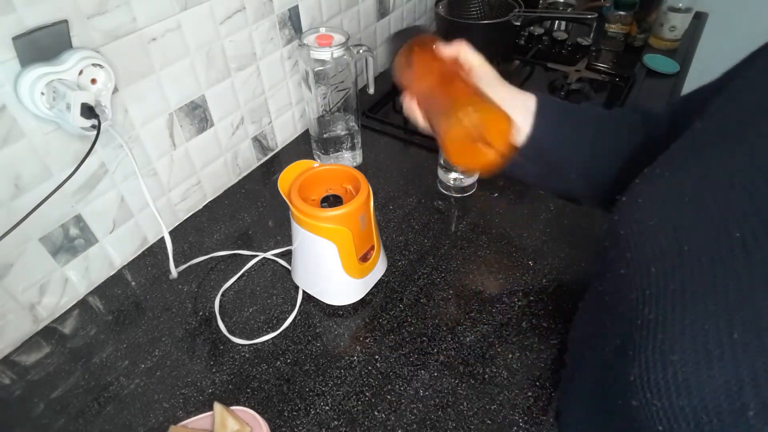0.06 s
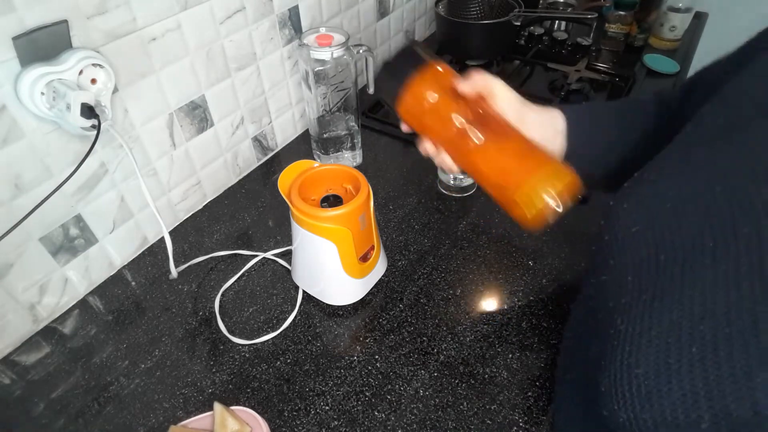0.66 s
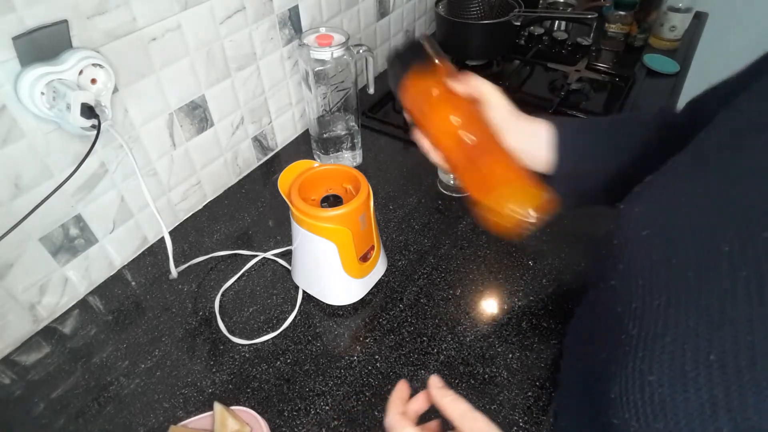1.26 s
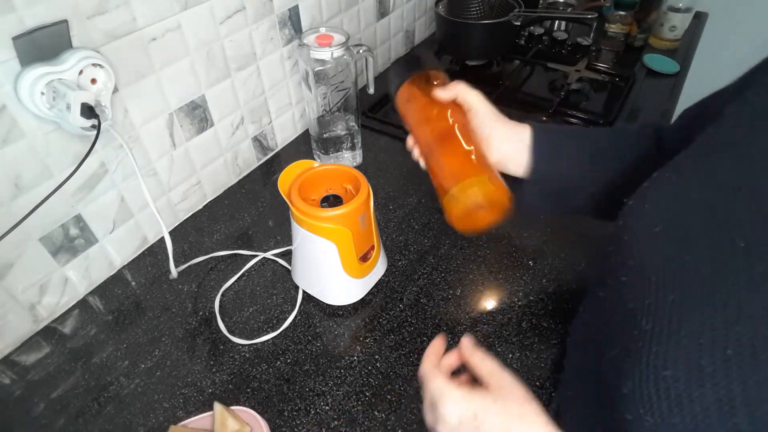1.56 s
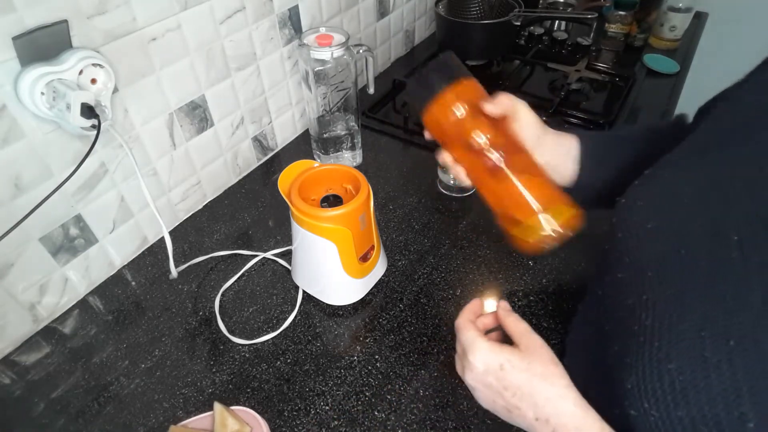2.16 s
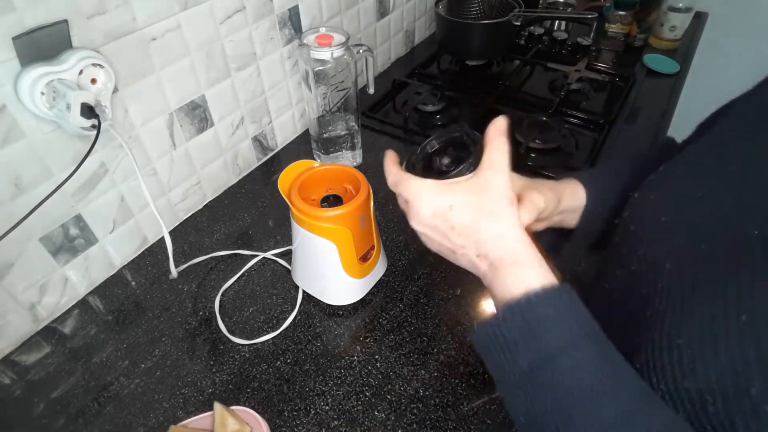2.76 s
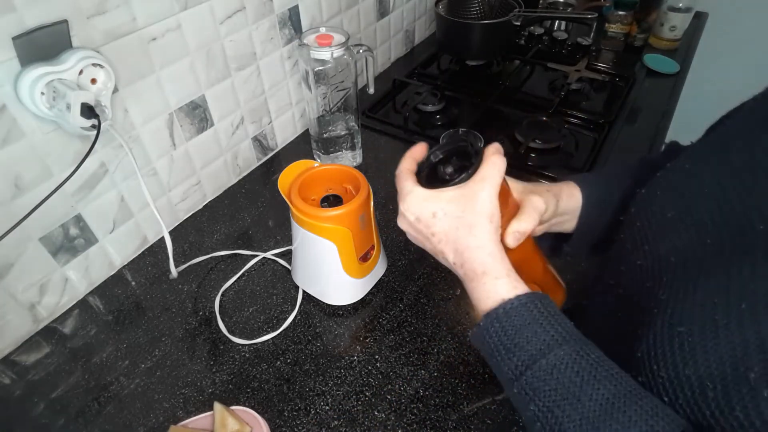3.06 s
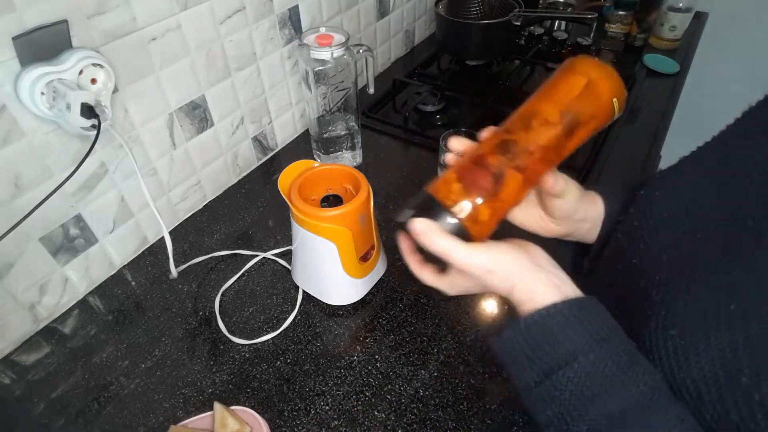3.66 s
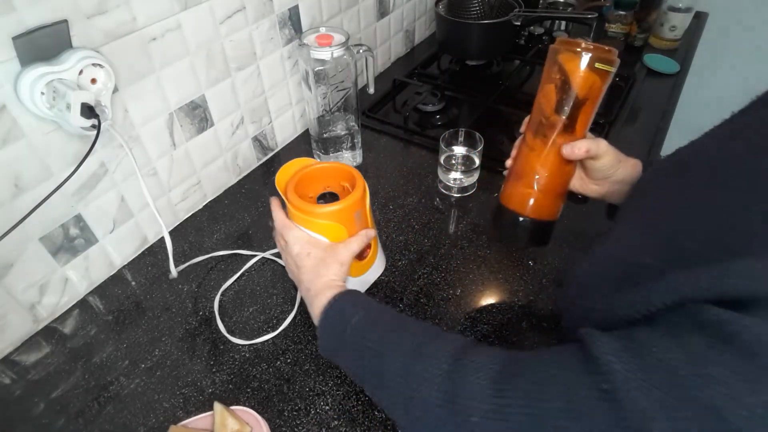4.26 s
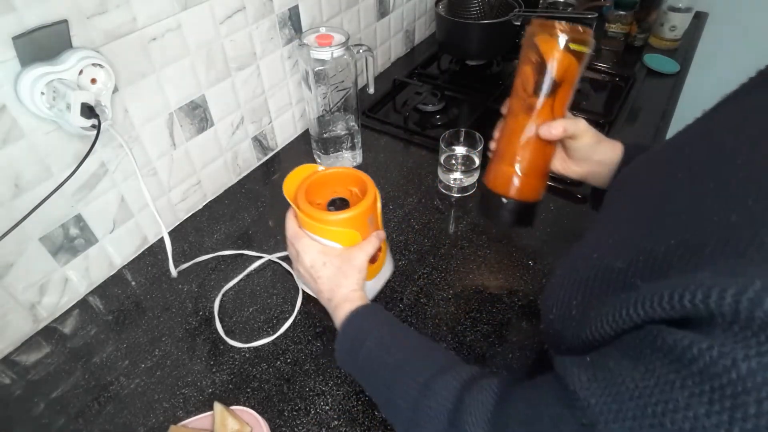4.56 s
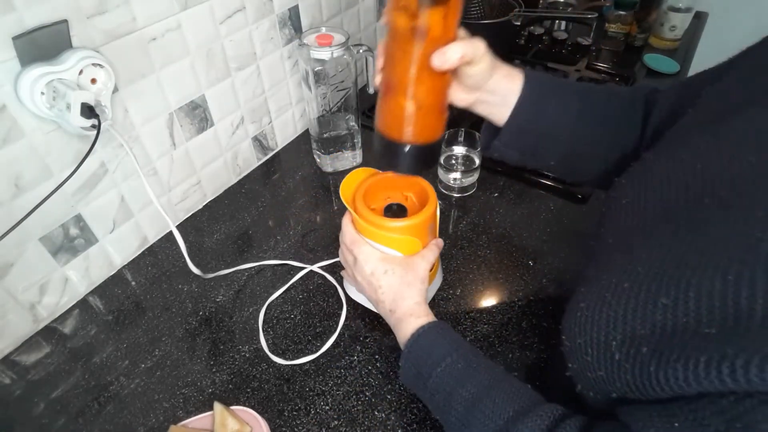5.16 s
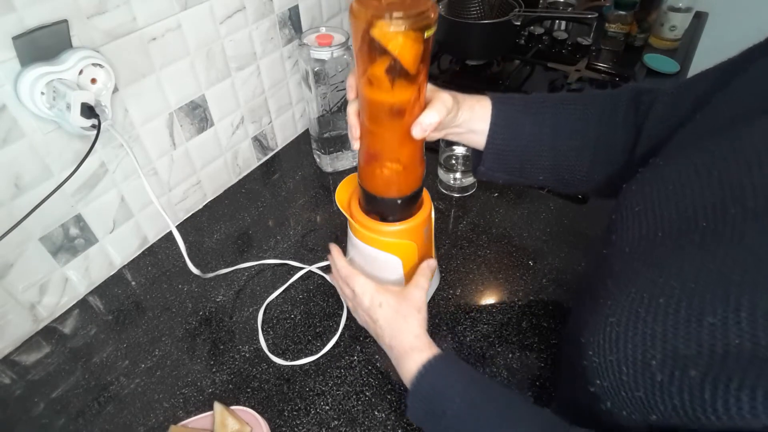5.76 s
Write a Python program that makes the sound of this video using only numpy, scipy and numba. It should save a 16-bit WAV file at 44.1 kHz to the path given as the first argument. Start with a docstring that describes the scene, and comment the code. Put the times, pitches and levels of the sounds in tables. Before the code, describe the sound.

Juice and fruit slosh and slap in a shaken plastic cup, followed by light finger clicks and a blender base knocking on a counter.

```python
"""A sealed plastic blender cup of juice and fruit, shaken four times a second over a tiled kitchen's
counter, within arm's reach of a two-port stereo microphone. Each forward stroke slaps the load against
the cup's end and sprays; each back stroke gulps; once, something glassy clinks. Fingers tap and rub as
the cup is turned over, then the motor base is gripped, knocks on the counter and judders along on its
rubber feet. Under it all lie low room tone and a faint appliance hum."""
import sys
import numpy as np
from scipy import signal
from scipy.fft import rfft, irfft
from scipy.io import wavfile
from scipy.ndimage import uniform_filter1d
from numba import njit

SR = 44100
rng = np.random.default_rng(int(sys.argv[2]) if len(sys.argv) > 2 else 0)


def dump(signal):
    """Clip the signal to [-1, 1] and save it as 16-bit WAV at the path in sys.argv[1]."""
    limited = np.clip(np.atleast_2d(signal).T, -1, 1)
    pcm = np.round(limited * 32767).astype(np.int16)
    wavfile.write(sys.argv[1], SR, pcm)


N = 255780
TIME = np.arange(N) / SR

# Table levels are relative: each source adds its own gains.
# spectra of a hard hit on the cup wall, of spray and of hollow plastic: f/Hz, level/dB
WALL_SPECTRUM = [(300, -16.5), (900, -12), (2000, -3), (3200, 0.5), (5200, 0.5), (6300, -14), (8000, -14.5),
                 (9500, -25), (12000, -20.5), (16000, -38.5)]
SPRAY_SPECTRUM = [(80, -33), (500, -14.5), (1500, -8.5), (3000, 0.5), (5200, -1), (6300, -12.5),
                  (8000, -21), (9500, -25.5), (12000, -29), (16000, -45)]
HOLLOW_SPECTRUM = [(100, -2.5), (400, 0), (800, 0.5), (1500, -8.5), (3000, -16), (8000, -32.5)]
# the load hits the cup's end: t/s, slap/dB, trapped air f/Hz, wall crack/dB, surge delay/s, surge/dB
FORWARD_STROKES = [(0.018, -23, 1620, -11, 0.017, -33), (0.178, -14.5, 1303, 1, 0.028, -32),
                   (0.436, -23.5, 1330, 7, 0.0096, -29), (0.67, -24.5, 1010, 3, 0.0092, -29.5),
                   (0.9, -23, 1330, 1, 0.047, -28), (1.165, -18, 1720, -5, 0.053, -26.5),
                   (1.433, -18.5, 1600, -1.5, .033, -30), (1.67, -20, 1640, -0.5, 0.041, -29.5),
                   (1.923, -26.5, 1560, -6, 0.038, -31.5), (2.161, -23, 1650, 1, 0.039, -32),
                   (2.409, -30, 1800, -12, 0.034, -30.5)]
# the juice falls back through the air: crest t/s, level/dB, gulp f/Hz
BACK_STROKES = [(.322, -35.5, 730), (.56, -31, 622), (.835, -30.5, 960), (1.091, -28.5, 850),
                (1.326, -26.5, 800), (1.587, -27, 620), (1.832, -29, 480), (2.091, -32, 935),
                (2.33, -32.5, 520), (2.573, -34.5, 393), (2.655, -40.5, 450)]


def amp(db):
    """Decibels to gain."""
    return 10 ** (np.asarray(db) / 20)


def unit(x):
    """Scale to an rms of one."""
    return x / np.sqrt(np.mean(x ** 2))


def add(track, s, sound):
    """Mix a sound into a track from second s on."""
    i = max(int(s * SR), 0)
    track[i:i + len(sound)] += sound[:N - i]


def gain_at(points, hz):
    """Read a table of f/Hz, level/dB as gains."""
    f, db = np.transpose(points)
    return amp(np.interp(np.log(hz + 1), np.log(f), db))


def colour(x, points, size=2048):
    """Causal filter of unit energy with the given spectral shape, built from its cepstrum."""
    cepstrum = irfft(np.log(gain_at(points, np.fft.rfftfreq(size, 1 / SR))))
    cepstrum[1:size // 2] *= 2
    cepstrum[size // 2 + 1:] = 0
    response = irfft(np.exp(rfft(cepstrum)))
    return signal.fftconvolve(x, response / np.sqrt(np.sum(response ** 2)))[:len(x)]


def ring(hz, t60):
    """One struck mode."""
    t = TIME[:SR // 2]
    return np.sin(2 * np.pi * hz * t) * np.exp(-np.log(1000) * t / t60)


def burst(fall_s):
    """A short crush of contact noise that starts at unit level."""
    shape = np.exp(-TIME[:SR // 20] / fall_s)
    return unit(rng.standard_normal(len(shape)) * shape) * np.sqrt(np.mean(shape ** 2))


def crackle(spread_db, click_samples=24):
    """Dense tiny clicks of very uneven size."""
    noise = rng.standard_normal(N)
    click_db = spread_db * np.minimum(rng.exponential(size=N // click_samples + 1), 5)
    return unit(noise * np.repeat(amp(click_db), click_samples)[:N])


def diffuse(count, alike_hz):
    """Noise from all sides: the bass is nearly the same at both ports, the treble unrelated."""
    mid, side = rfft(rng.standard_normal((2, count)))
    alike = .95 / (1 + (np.fft.rfftfreq(count, 1 / SR) / alike_hz) ** 2)
    left_right = np.array([[1], [-1]])
    return irfft(mid * np.sqrt((1 + alike) / 2) + side * np.sqrt((1 - alike) / 2) * left_right, count)


def room_tone(air_db=-62):
    """Air murmurs all round the microphone and an appliance hums faintly."""
    # the kitchen's air spectrum and the hum's tones: f/Hz, level/dB
    air_spectrum = [(15, -42.5), (25, -12), (55, -8.5), (82, -21), (104, -9), (164, -6), (183, -6.5),
                    (246, -7), (482, -21), (684, -22), (1110, -26.5), (2920, -32), (3340, -34), (7500, -42),
                    (15500, -39)]
    hum_tones = [(59.2, -87), (118.4, -77.5), (161.5, -70.5)]
    air = unit(np.array([colour(port, air_spectrum) for port in diffuse(N, alike_hz=693)]))
    hum = sum(amp(db) * unit(np.sin(2 * np.pi * hz * TIME)) for hz, db in hum_tones)
    return amp(air_db) * air + hum


def kitchen_reverb(x, bands_hz=(100, 900, 4800, 11000), t60s=(.98, .57, .57, .31), tail_db=-4):
    """The tiled kitchen rings on, shortest in the treble."""
    t = TIME[:SR]
    hz = np.fft.rfftfreq(SR, 1 / SR)
    noise, tail = rfft(diffuse(SR, alike_hz=480)), 0
    for share, t60 in zip(np.eye(4), t60s):
        band = irfft(noise * np.interp(np.log(hz + 1), np.log(bands_hz), share), SR)
        tail = tail + band * np.exp(-np.log(1000) * t / t60)
    response = amp(tail_db) * unit(tail * np.clip(t / .0033, 0, 1)) / np.sqrt(SR)
    return signal.fftconvolve(x[None], response, axes=1)[:, :N]


def near_echoes(x, early_db=-2, early_s=.0025):
    """Counter, tiles and body scatter the sound for a few milliseconds, differently at each port."""
    t = TIME[:SR // 10]
    echoes = unit(diffuse(len(t), alike_hz=560) * np.exp(-t / early_s) * (t > .0006)) / np.sqrt(len(t))
    response = rfft((t == 0) + amp(early_db) * echoes)
    # the scatter smears the sound but leaves its broad colour alone
    response = response / np.sqrt(uniform_filter1d(abs(response) ** 2, size=60, axis=1))
    return signal.fftconvolve(x[None], irfft(response, len(t))[:, :len(t) // 2], axes=1)[:, :N]


def rub_envelope(moves, attack_s=.033, release_s=.025):
    """Each rubbing movement builds up, holds for its length and dies away."""
    return sum(amp(db) * np.clip((TIME - s) / attack_s + 1, 0, 1)
               * np.exp(-np.maximum(TIME - s - length, 0) / release_s) for s, length, db in moves)


def rubbing():
    """Hands rub the plastic, a knitted sleeve swishes and the base rumbles as it drags on the counter."""
    # movements of hand, sleeve and base: t/s, length/s, level/dB
    grips = [(2.7, .1, -61), (4.31, 0.033, -49.5), (4.53, 0.31, -60), (5.1, .12, -68), (5.38, 0.064, -57),
             (5.6, 0.021, -62)]
    swishes = [(3.78, 0.11, -60.5), (3.95, .5, -65), (4.78, 0.41, -69.5), (5.4, .04, -68),
               (5.6, 0.023, -68)]
    drags = [(4.32, 0.045, -57), (4.5, 0.15, -51), (4.75, 0.062, -54), (5.1, .08, -63)]
    # friction spectra of sleeve and base: f/Hz, level/dB
    sleeve_spectrum = [(800, 0), (2000, -3.5), (3500, -4), (5000, -0.5), (6300, -17), (9000, -21),
                       (16000, -23)]
    drag_spectrum = [(25, -18), (55, 2), (105, 2.5), (170, -5.5), (400, -20), (2000, -82)]
    hands = colour(rub_envelope(grips) * crackle(spread_db=3), HOLLOW_SPECTRUM)
    sleeve = colour(rub_envelope(swishes) * crackle(spread_db=3), sleeve_spectrum)
    rumble = colour(rub_envelope(drags) * rng.standard_normal(N), drag_spectrum)
    return amp(-4.5) * hands + amp(-6) * sleeve + amp(-8.5) * rumble


def finger_taps():
    """Fingers on plastic: a sharp click, a hollow body under it and a brief ring of the touched spot."""
    # taps: t/s, click/dB, body/dB, ring f/Hz
    taps = [(2.782, -62, -60, 1424), (2.851, -56, -68, 1400), (3.671, -54, -49, 1290),
            (3.753, -42.5, -47.5, 1526), (3.772, -46.5, -63, 1500), (4.303, -54, -56, 755),
            (4.34, -49.5, -46, 1370), (4.448, -40.5, -59, 1480), (4.535, -40.5, -54.5, 1290),
            (4.592, -51, -48, 785), (4.688, -65, -50, 910), (5.406, -57.5, -49.5, 755),
            (5.496, -55.5, -70, 1310), (5.59, -60, -62, 750)]
    # the click's spectrum: f/Hz, level/dB
    click_spectrum = [(500, -32), (1500, -3.5), (3000, 1), (5000, 3.5), (6500, -12), (10000, -14.5),
                      (16000, -25)]
    clicks, bodies, rings = np.zeros((3, N))
    for s, click_db, body_db, hz in taps:
        add(clicks, s, amp(click_db) * burst(fall_s=.0023))
        add(bodies, s, amp(body_db + 2) * burst(fall_s=.0043))
        add(rings, s, amp(body_db + 10) * ring(hz, t60=.011))
    return colour(clicks, click_spectrum) + colour(bodies, HOLLOW_SPECTRUM) + rings


def feet_judder(push_s=.0024):
    """Rubber feet slip and catch on the counter; each soft push rocks the base."""
    # slips: t/s, level/dB
    slips = [(5.375, -34), (5.403, -33.5), (5.436, -32.5), (5.473, -33.5), (5.512, -38), (5.55, -42.5),
             (5.585, -43.5)]
    # modes of the base on its feet: f/Hz, level/dB, t60/s
    rocking_modes = [(90.3, -7, 0.04), (108, -1.5, 0.11), (152.4, -19, 0.056), (323, -12.5, 0.062),
                     (486, -12, 0.033), (747, -32, 0.12)]
    push = 1 - np.exp(-TIME[:SR // 2] / push_s)
    rocking = sum(amp(db) * ring(hz, t60) for hz, db, t60 in rocking_modes)
    out = np.zeros(N)
    for s, db in slips:
        add(out, s, amp(db) * push * rocking)
    return out


def base_knock():
    """The motor base drops onto its foot: the shell sounds first, the heavy body just after."""
    # the landing on the counter: t/s, level/dB
    landings = [(4.7293, -30)]
    # modes of the base: f/Hz, level/dB, t60/s, delay/s
    base_modes = [(130, -21, 0.07, 0.0044), (542, 4.5, 0.015, 0.0022), (703, -2, 0.033, 0),
                  (1130, -5.5, 0.016, 0.0015), (2450, 1.5, 0.014, 0.0041), (2700, -14, 0.014, 0.0019),
                  (7600, -26, 0.0074, 0)]
    out = np.zeros(N)
    for s, db in landings:
        for hz, mode_db, t60, delay in base_modes:
            add(out, s + delay, amp(db + mode_db) * ring(hz, t60))
    return out


def glass_clink(detune=.0019):
    """A quick chatter of hard contacts sets the same high modes ringing."""
    # contacts: t/s, level/dB, tilt/(dB per octave)
    contacts = [(.4612, -27, -0.5), (.4635, -20, 0.5), (.479, -19.5, 3)]
    # glassy modes: f/Hz, level/dB, t60/s
    glass_modes = [(3482, -4.5, 0.05), (3510, 0.5, 0.057), (4640, -1.5, 0.12), (5168, 0, 0.092),
                   (5180, -2, .12), (6330, -6.5, 0.1), (7520, -10, .09), (10130, -7, .1),
                   (10380, -22.5, 0.11), (12260, -13, 0.074), (13000, -13, .09), (14330, -29, .1),
                   (15430, -22, .06)]
    rings, clicks = np.zeros((2, N))
    for s, db, tilt_db in contacts:
        for hz, mode_db, t60 in glass_modes:
            gain = amp(db + mode_db + tilt_db * np.log2(hz / 5000))
            add(rings, s, gain * ring(hz * (1 + detune * rng.standard_normal()), t60))
        add(clicks, s, amp(db - 3) * burst(fall_s=.0065))
    return amp(-5) * rings + colour(clicks, WALL_SPECTRUM)


@njit
def chirps(starts, hz, gains, cycles, glide):
    """Bubble tones: damped sines whose pitch rises as they fade."""
    out = np.zeros(N)
    for k in range(len(starts)):
        life = cycles[k] * SR / hz[k]
        for i in range(min(int(life), N - starts[k])):
            age = i / life
            swell = 1 - np.exp(-age * cycles[k])
            phase = 2 * np.pi * hz[k] * i / SR * (1 + glide * age / 2)
            out[starts[k] + i] += gains[k] * swell * np.exp(-6 * age) * np.sin(phase)
    return out


def plinks(cycles=30.0, glide=.13):
    """Small bubbles ring long enough to stand out of the wash."""
    # single bubbles: t/s, level/dB, f/Hz
    lone_bubbles = [(.769, -31.5, 3430), (1.2872, -20, 3820), (1.327, -24, 3130), (1.469, -26.5, 4200),
                    (1.780, -29.5, 3700), (2.5128, -31.5, 3510)]
    s, db, hz = np.transpose(lone_bubbles)
    return chirps((s * SR).astype(np.int64), hz.copy(), amp(db + 4), np.full(len(s), cycles), glide)


def glugs(count=3, gap_s=.013, step_octaves=.25, scatter_octaves=.12, cycles=9.0, glide=.15):
    """On each back stroke the air breaks through in a few bubbles, the biggest and lowest first."""
    s, db, hz = np.repeat(BACK_STROKES, count, axis=0).T
    late, detune = rng.uniform(-.87, 1, (len(s), 2)).T
    turn = np.arange(len(s)) % count - (count - 1) / 2
    starts = ((s + gap_s * (turn + late / 2)) * SR).astype(np.int64)
    bubble_hz = hz * 2 ** (step_octaves * turn + scatter_octaves * detune)
    return chirps(starts, bubble_hz, amp(db - 2), np.full(len(s), cycles), glide)


def bubbles(flow, low_hz, high_hz, cycles, spread_db, count, glide=.15, sink_octaves_per_s=0):
    """Air pockets ring briefly, each scaled by the flow that made it; foam can lower their pitch."""
    when, pitch, size, life, sign = rng.random((count, 5)).T
    starts = ((np.arange(count) + when) * (N - 1) / count).astype(np.int64)
    shaken_s = np.minimum(starts / SR, BACK_STROKES[-1][0])
    hz = low_hz * (high_hz / low_hz) ** pitch * 2 ** (-sink_octaves_per_s * shaken_s)
    gains = amp(-spread_db * np.log(np.maximum(size, .03))) * np.sqrt(hz) * np.sign(sign - .5)
    lives = cycles * (.5 + life)
    steady_rms = np.std(chirps(starts, hz, gains, lives, glide))
    return chirps(starts, hz, gains * flow[starts], lives, glide) / steady_rms


def surge(s, rise_s, fall_s, churn_db=-23, churn_s=.065):
    """The flow swells to a crest at second s and falls away, with weaker churning around it."""
    age = TIME - s
    return np.exp(np.minimum(age / rise_s, -age / fall_s)) + amp(churn_db) * np.exp(-abs(age) / churn_s)


def slosh(deepen_db_per_s=1.5, dull_db_per_s=1.5):
    """Every surge folds in bubbles and throws spray: forward strokes are bright, back strokes deep."""
    forward = sum(amp(db) * surge(s + delay, rise_s=.019, fall_s=.021)
                  for s, *_, delay, db in FORWARD_STROKES)
    back = sum(amp(db) * surge(s, rise_s=.016, fall_s=.013) for s, db, _ in BACK_STROKES)
    flow = forward + back
    # as the juice foams up, the slosh gets deeper and the back strokes spray less
    end = BACK_STROKES[-1][0]
    foam_s = np.minimum(TIME, end) - end / 2  # time from the middle of the shaking
    deep = (amp(-14) * forward + amp(-9.5) * back) * amp(deepen_db_per_s * foam_s)
    thrown = amp(-2) * forward + amp(-5.5 - dull_db_per_s * foam_s) * back
    small = bubbles(flow, low_hz=850, high_hz=2150, cycles=3.2, spread_db=5, count=4000)
    gulps = bubbles(deep, low_hz=414, high_hz=1150, cycles=6.5, spread_db=4.5, count=1500,
                    sink_octaves_per_s=.2)
    thuds = bubbles(np.sqrt(deep * flow), low_hz=110.8, high_hz=368, cycles=12, spread_db=2.5,
                    count=1600, glide=.11)
    spray = colour(thrown * crackle(spread_db=3.5), SPRAY_SPECTRUM)
    return amp(-9) * small + amp(-2) * gulps + amp(-15.5) * thuds + amp(-6.5) * spray


def slaps(cycles=8, cushion_s=.001):
    """Trapped air rings, the cup knocks and its wall cracks: sharply under juice, duller under fruit."""
    # fruit chunks that hit the wall hard: t/s, level/dB, ring f/Hz, wall crack/dB
    chunks = [(.159, -30.5, 990, 0), (.695, -16, 1790, -3), (.713, -29.5, 940, 6.5),
              (.927, -21.5, 1100, 0.5), (1.092, -28.5, 1100, -21), (1.194, -25.5, 1320, -6.5),
              (1.468, -22, 1340, 0), (1.705, -21.5, 1200, -7), (1.949, -20.5, 1660, -6.5),
              (2.43, -32.5, 1150, 9.5), (2.675, -47.5, 1080, 9)]
    # spectrum of the cup's knock: f/Hz, level/dB
    shell_spectrum = [(70, -41.5), (300, -14.5), (800, -4), (1300, -0.5), (1750, -0.5), (2200, -10.5),
                      (5000, -31.5)]
    pockets, cracks, thumps, knocks = np.zeros((4, N))
    cushion = 1 - np.exp(-TIME[:SR // 20] / cushion_s)
    for s, db, hz, *_ in list(FORWARD_STROKES) + list(chunks):
        swell = 1 - np.exp(-TIME[:SR // 2] * hz)  # the pocket takes a cycle to close
        add(pockets, s, amp(db + 8) * swell * ring(hz, cycles / hz))
        add(knocks, s, amp(db - 9) * burst(fall_s=.003))
    for s, db, _, wall_db, *_ in FORWARD_STROKES:
        add(cracks, s, amp(db + wall_db - 2) * cushion * burst(fall_s=.003))
    for s, db, _, wall_db in chunks:
        add(thumps, s, amp(db + wall_db - 2) * cushion * burst(fall_s=.0038))
    wall = colour(cracks, WALL_SPECTRUM) + colour(thumps, SPRAY_SPECTRUM)
    return pockets + wall + colour(knocks, shell_spectrum)


def scene():
    """Cup, glass, base and hands within arm's reach; the judder comes mostly through the counter."""
    spots = [slaps(), slosh(), glugs() + plinks(), glass_clink(), base_knock() + rubbing()]
    fingers, feet = finger_taps(), feet_judder()
    reverb = kitchen_reverb(sum(spots) + amp(1) * fingers + amp(-7) * feet)
    return sum(near_echoes(x) for x in spots + [fingers]) + feet + reverb + room_tone()


def record(dry, lag_s=.000025, low_cut_hz=58, high_cut_hz=15900):
    """Each microphone port has its own colour and the left one lags; deep bass and the top are cut."""
    # balance of the two ports: f/Hz, left minus right/dB
    port_balance = [(200, 0.5), (700, -1.5), (1300, 0), (2400, 0.5), (4600, -6.5), (6500, -1), (9000, -1.5),
                    (13000, 1.5)]
    hz = np.fft.rfftfreq(N, 1 / SR)
    tilt = np.sqrt(gain_at(port_balance, hz))
    ports = np.array([tilt * np.exp(-2j * np.pi * hz * lag_s), 1 / tilt])
    heard = irfft(rfft(dry) * ports, N)
    heard = signal.sosfilt(signal.butter(3, low_cut_hz, "high", fs=SR, output="sos"), heard)
    return signal.sosfilt(signal.ellip(10, .2, 80, high_cut_hz, fs=SR, output="sos"), heard)


dry = scene()
out = record(dry)
dump(out)
```